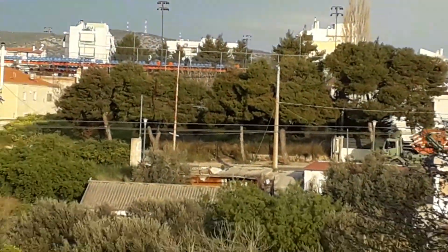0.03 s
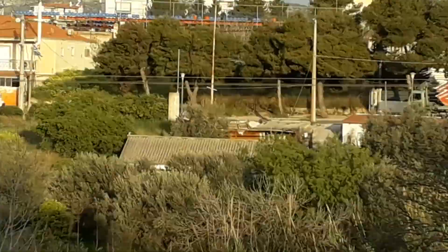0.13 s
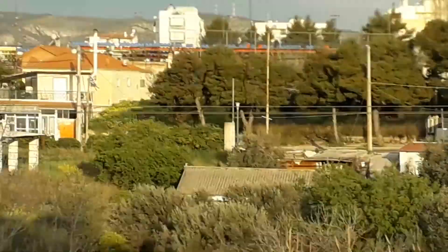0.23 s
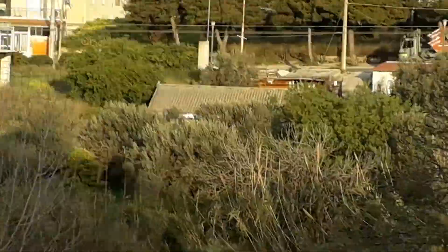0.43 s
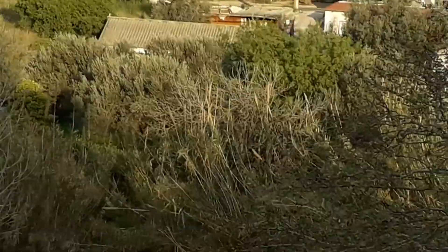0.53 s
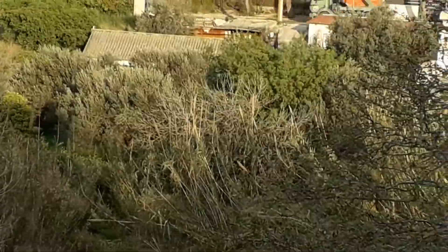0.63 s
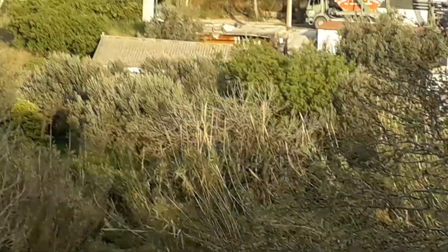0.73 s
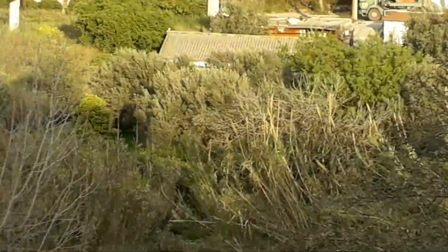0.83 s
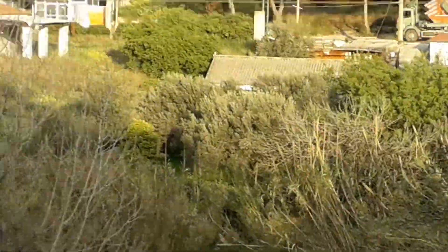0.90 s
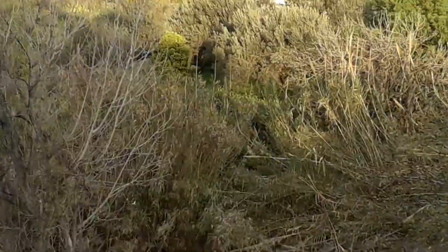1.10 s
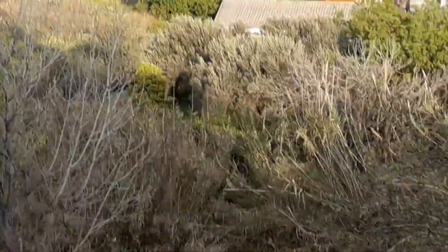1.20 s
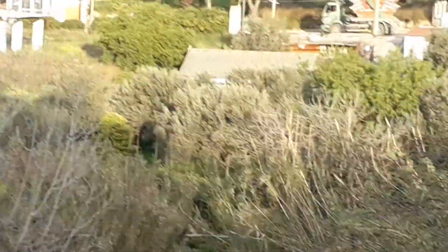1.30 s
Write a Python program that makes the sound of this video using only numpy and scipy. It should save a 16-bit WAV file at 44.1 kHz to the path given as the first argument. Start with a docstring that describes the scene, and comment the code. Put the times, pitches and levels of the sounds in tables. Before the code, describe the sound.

Close handling noise on a camera microphone outdoors: a fingertip thumps, rubs and taps dully, then lifts away with one sharp knock. The uncovered microphone picks up quiet, steady far-off traffic and a light breeze.

```python
"""Outdoors, a finger covers the microphone port (its small opening) on a hand-held camera.
First the finger shifts, pushing the air in the port into muffled thumps and tapping the case.
It rumbles, rubs and ticks across the case, then comes off with a sharp knock at about half a second.
After that the open port hears a steady wash of distant traffic and breeze, with a few light
brushes of the hand."""
import sys
import numpy as np
from scipy import signal
from scipy.fft import rfft, irfft, next_fast_len
from scipy.io import wavfile
from scipy.ndimage import uniform_filter1d

SR = 44100
rng = np.random.default_rng(int(sys.argv[2]) if len(sys.argv) > 2 else 0)


def dump_mix(stems):
    """Bounce the given channels to the path in sys.argv[1] as a 16-bit WAV at rate SR."""
    frames = np.atleast_2d(stems).T  # one column per channel
    limited = np.clip(frames, -1, 1)  # hard clip at full scale
    pcm = np.round(limited * 32767).astype(np.int16)
    wavfile.write(sys.argv[1], SR, pcm)


N = 59535
T = np.arange(N) / SR


def from_db(db):
    """Turn decibels into a number to multiply by."""
    return 10 ** (np.asarray(db) / 20)


def unit_power(x):
    """Scale a sound to an average power of one."""
    return x / np.sqrt(np.mean(x ** 2) + 1e-20)


def loudness(curve):
    """Join (time_s, level_db) points into a volume curve, silent before the first."""
    times, db = np.transpose(curve)
    return from_db(np.interp(T, times, db, left=-200))


def shape_tone(x, tone):
    """Turn lows and highs up or down, following (pitch_hz, gain_db) points."""
    size = 2 * next_fast_len(N)
    hz, db = np.transpose(tone)
    grid_hz = np.maximum(np.arange(size // 2 + 1) * SR / size, 1)
    gain = from_db(np.interp(np.log(grid_hz), np.log(hz), db))
    # minimum phase: the filter rings after a click, never before it
    cepstrum = irfft(np.log(gain), size)
    cepstrum[1:size // 2] *= 2
    cepstrum[size // 2 + 1:] = 0
    return irfft(rfft(x, size) * np.exp(rfft(cepstrum)), size)[:N]


def noise(tone):
    """Smooth noise with the given tone."""
    return unit_power(shape_tone(rng.standard_normal(N), tone))


def friction(tone, slips_per_s=1500, spread_db=4, hiss_gain=0.45):
    """Skin grips and lets go: tiny random slips of uneven size over a smooth hiss."""
    sizes = from_db(spread_db * np.minimum(rng.exponential(1, N), 4)) * rng.choice([-1, 1], N)
    slips = unit_power(sizes * (rng.random(N) < slips_per_s / SR))
    return unit_power(shape_tone(slips + hiss_gain * rng.standard_normal(N), tone))


def clicks(rows):
    """One bare click for each (start_s, level_db) row."""
    out = np.zeros(N)
    for start_s, db in rows:
        out[int(start_s * SR)] += from_db(db)
    return out


def swells(rows):
    """A volume curve that rises and falls once for each row."""
    return sum(from_db(db) * np.exp(-((T - peak_s) / half_width_s) ** 2)
               for peak_s, half_width_s, db in rows)


# tone of the low traffic wash and of the airy breeze: pitch_hz, gain_db
TRAFFIC_TONE = [(20, -40.5), (48, -12.5), (90, -7.5), (145, 2), (240, -3), (370, -9.5), (540, -5),
                (750, -8.5), (1000, -7.5), (1500, -12.5), (2500, -19), (4000, -24), (6000, -40.5),
                (8500, -70), (16000, -70)]
BREEZE_TONE = [(400, -3.5), (1400, 3), (2600, 2), (4000, -3), (5500, -13), (7000, -22), (8700, -41.5),
               (16000, -57)]
# how the breeze rises and falls: time_s, level_db
BREEZE_LEVELS = [(.5, -43), (.57, -47.5), (.66, -48.5), (.735, -50), (.785, -47.5), (.85, -48.5),
                 (.98, -59), (1.06, -55.5), (1.16, -48), (1.23, -51), (1.35, -50)]


def open_air(open_s=.508, rise_s=0.0035, traffic_db=-42.5, flutter_db=1.4):
    """Distant traffic and a fluttering breeze, heard once the port is uncovered."""
    opening = .5 + .5 * np.tanh((T - open_s) / rise_s)
    flutter = unit_power(uniform_filter1d(rng.standard_normal(N), size=900))
    breeze = loudness(BREEZE_LEVELS) * from_db(flutter_db * flutter) * noise(BREEZE_TONE)
    traffic = from_db(traffic_db) * noise(TRAFFIC_TONE)
    return opening * (traffic + breeze)


# light brushes of the hand, and softer rustles: peak_s, half_width_s, level_db
HAND_BRUSHES = [(0.532, 0.035, -51), (.593, .004, -53), (1.168, 0.019, -48), (1.28, .005, -53.5)]
SOFT_RUSTLES = [(.765, 0.012, -59), (.865, 0.023, -68), (1.275, 0.017, -58), (1.315, 0.016, -57)]
# the tone of each: pitch_hz, gain_db
BRUSH_TONE = [(200, 5), (1800, 3), (4500, 2), (7000, -3), (9800, -24), (12500, -6.5), (16000, -8)]
RUSTLE_TONE = [(1000, -30), (4000, -9), (5500, 2), (6800, -3.5), (8800, -29), (13500, -28), (16000, -21)]


def hand_brushes():
    """Skin grazes the case in short grainy brushes and soft hissy rustles."""
    return swells(HAND_BRUSHES) * friction(BRUSH_TONE) + swells(SOFT_RUSTLES) * noise(RUSTLE_TONE)


# the fingertip meets the case: start_s, level_db
FINGER_TAPS = [(.186, -39.5), (0.2158, -32), (0.2457, -32.5), (0.2676, -23.5), (0.3404, -34), (.387, -39),
               (.4415, -33), (0.4593, -27), (0.468, -25), (.494, -19.5), (0.5013, -10), (1.146, -35)]
# the notes the case rings at: pitch_hz, level_db, fade_s (time to fall by 60 dB)
CASE_NOTES = [(442.8, -0.5, 0.032), (545, -5.5, 0.021), (805, -6, 0.014), (1073, -6.5, 0.022)]


def case_taps(skin_cutoff_hz=725):
    """Each tap rings the case; soft skin dulls the ring and the hand stops it quickly."""
    t = T[:SR // 10]
    ring = sum(from_db(db - 60 * t / fade_s) * np.sin(2 * np.pi * hz * t)
               for hz, db, fade_s in CASE_NOTES)
    dull_ring = signal.sosfilt(signal.butter(4, skin_cutoff_hz, fs=SR, output="sos"), ring)
    return signal.fftconvolve(clicks(FINGER_TAPS), dull_ring)[:N]


# how loud the pressing finger rumbles: time_s, level_db
RUMBLE_LEVELS = [(0, -52.5), (.05, -49), (.15, -50.5), (.2, -39), (.27, -27.5), (.32, -27.5), (.37, -35),
                 (.42, -40), (.47, -29), (.51, -22), (.535, -57), (.58, -98)]
# its deep tone: pitch_hz, gain_db
RUMBLE_TONE = [(20, -7.5), (50, 6), (150, 1), (280, -10), (450, -25), (900, -37), (2000, -62),
               (6000, -73.5)]


def finger_rumble():
    """The finger pressing on the port makes a low rumble."""
    return loudness(RUMBLE_LEVELS) * noise(RUMBLE_TONE)


# how loud the thin slide and the coarse rub are: time_s, level_db
SLIDE_LEVELS = [(.19, -98), (.215, -70.5), (.24, -60), (.268, -47), (.285, -45.5), (.305, -42),
                (.335, -57.5), (.347, -74), (.38, -83), (.42, -98)]
RUB_LEVELS = [(.16, -75.5), (.21, -68.5), (.24, -63.5), (.27, -43), (.288, -42), (.303, -36.5),
              (.338, -37.5), (.348, -55.5), (.405, -59.5), (.425, -70.5), (.46, -49.5), (.49, -44),
              (.51, -32.5), (.535, -46), (.57, -71)]
# the tone of each: pitch_hz, gain_db
SLIDE_TONE = [(500, -3.5), (2400, -20), (3600, -1), (4700, 0.5), (6200, -13), (8000, -33), (9800, -46),
              (12500, -25), (16000, -22)]
RUB_TONE = [(100, -8.5), (330, 2), (550, -3.5), (1000, -4), (1300, -11), (4400, -22), (7000, -28.5),
            (9800, -41.5), (12500, -29.5), (16000, -28.5)]


def finger_rub():
    """Skin slides across the case with a thin hiss and a coarse rub."""
    return loudness(SLIDE_LEVELS) * friction(SLIDE_TONE) + loudness(RUB_LEVELS) * friction(RUB_TONE)


# small snaps of skin: start_s, level_db
SKIN_TICKS = [(.2158, -35), (.2455, -36), (.2698, -16.5), (.3185, -13.5), (.4017, -44), (.4085, -47.5),
              (.4778, -40), (.4942, -22.5), (.5022, -13), (.5212, -18), (.5240, -14.5), (.5395, -19)]
# tone of the ticks and of the knock: pitch_hz, gain_db
TICK_TONE = [(100, -7.5), (500, 7), (2000, -2.5), (4500, 5), (7000, -6.5), (9500, -27), (12500, -10.5),
             (16000, -10.5)]
KNOCK_TONE = [(100, 13), (450, -8), (750, 2), (1100, 7), (1450, 1), (2200, 5), (4000, -2.5), (7000, -16),
              (9500, -44.5), (12500, -52), (16000, -35)]


def finger_snaps(knock_s=.5064, knock_db=5):
    """Skin snaps off the case in small ticks, and with one sharp knock as the finger comes free."""
    ticks = shape_tone(clicks(SKIN_TICKS), TICK_TONE)
    knock = shape_tone(clicks([(knock_s, knock_db)]), KNOCK_TONE)
    return ticks - knock


# pushes and pulls on the air in the port: peak_s, level_db, half_width_s, direction (1 press, -1 lift)
AIR_PUSHES = [(0.043, -35, 0.0013, 1), (.094, -29.5, 0.0013, 1), (.171, -31, 0.0011, 1),
              (.1893, -17.5, 0.0014, 1), (0.2182, -9, 0.00092, 1), (0.2525, 1, 0.0017, 1),
              (0.2687, -3.5, 0.0015, -1), (.274, -13, 0.0025, 1), (0.2822, 5, 0.0017, -1),
              (0.343, -14, .0014, 1), (.383, -27, .0014, 1), (0.3916, -26.5, 0.00057, 1),
              (0.4433, -26, 0.00036, 1), (.451, -5, 0.0022, -1), (0.4612, -3, 0.00071, 1),
              (0.4649, -4, 0.002, -1), (0.4804, -22.5, .0025, -1), (0.5006, -13, 0.0012, -1),
              (.5030, 0.5, 0.0004, 1), (0.5059, 4.5, 0.0017, -1)]


def finger_thumps(bass_cutoff_hz=75, damping=1.26, leak_hz=22):
    """The finger moves the air; the port loses deep bass, so each pulse swings back and settles."""
    pressure = sum(direction * from_db(db) / np.cosh(np.minimum(np.abs(T - peak_s) / half_width_s, 20))
                   for peak_s, db, half_width_s, direction in AIR_PUSHES)
    w = 2 * np.pi * bass_cutoff_hz
    bass_cut = signal.bilinear([1, 0, 0], [1, damping * w, w * w], SR)
    swing = signal.lfilter(*bass_cut, pressure)
    return signal.sosfilt(signal.butter(1, leak_hz, "high", fs=SR, output="sos"), swing)


def scene():
    """The finger, the hand and the open air add up at one microphone."""
    finger = finger_thumps() + case_taps() + finger_rumble() + finger_rub() + finger_snaps()
    return (finger + hand_brushes() + open_air())[None]


def record(dry, hiss_db=-78.5, treble_cutoff_hz=15850):
    """The camera adds faint hiss, flattens peaks that are too loud and cuts the highest treble."""
    clipped = np.clip(dry + from_db(hiss_db) * rng.standard_normal(dry.shape), -1, 1)
    return signal.sosfilt(signal.ellip(10, .1, 80, treble_cutoff_hz, fs=SR, output="sos"), clipped)


dry = scene()
out = record(dry)
dump_mix(out)
```